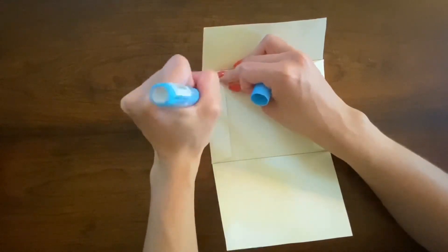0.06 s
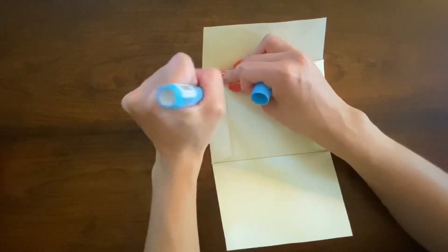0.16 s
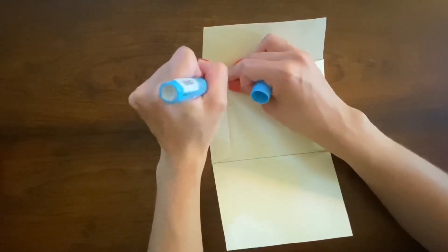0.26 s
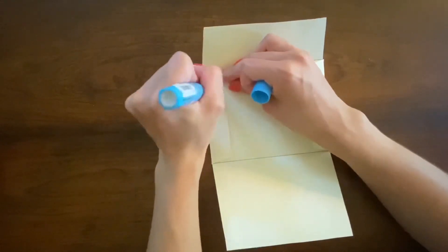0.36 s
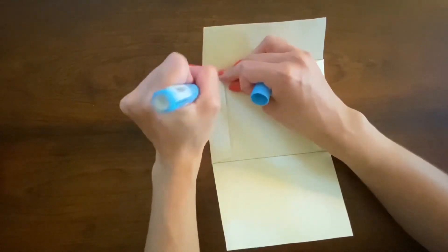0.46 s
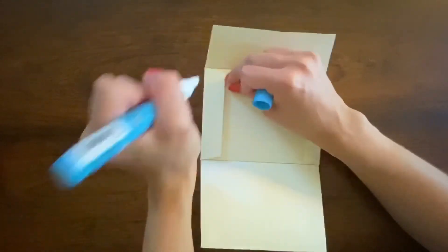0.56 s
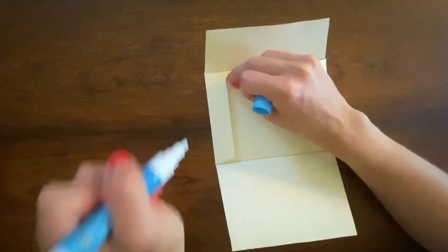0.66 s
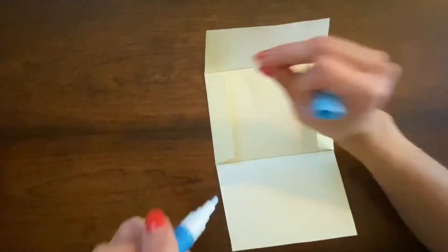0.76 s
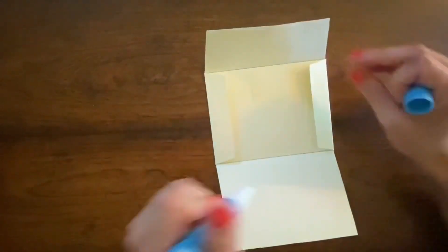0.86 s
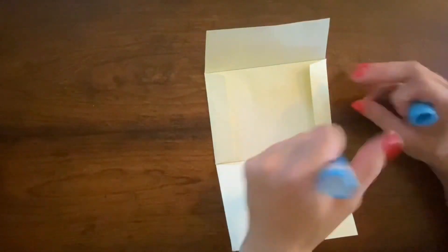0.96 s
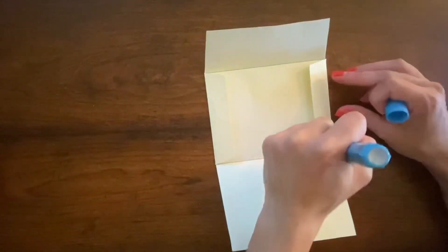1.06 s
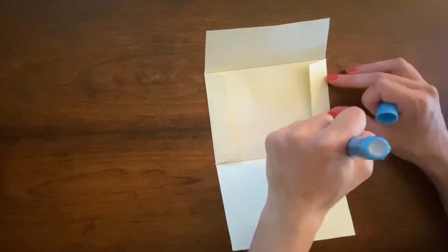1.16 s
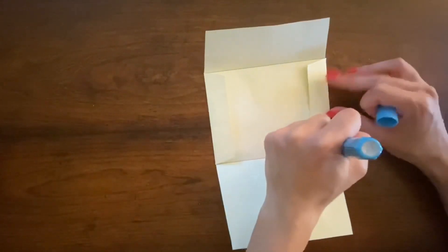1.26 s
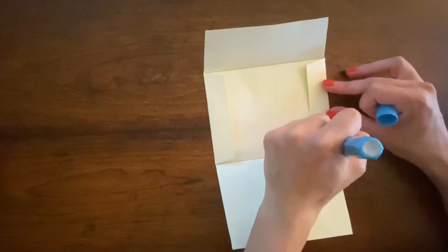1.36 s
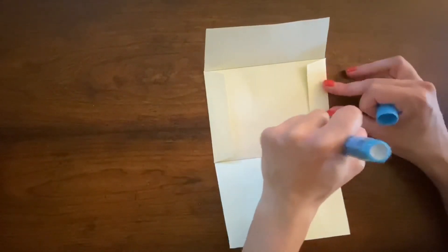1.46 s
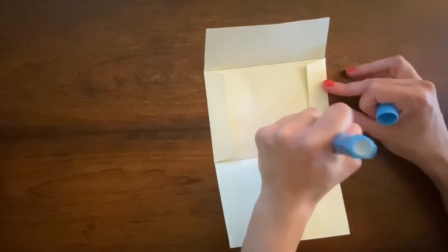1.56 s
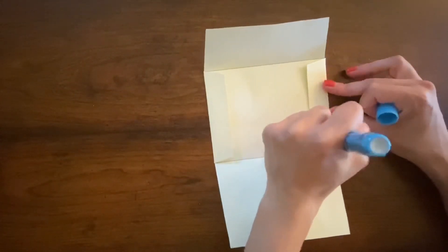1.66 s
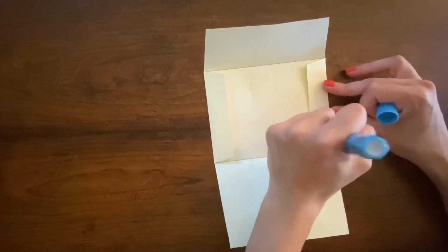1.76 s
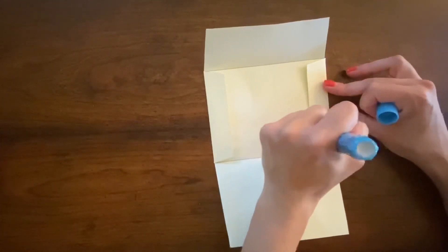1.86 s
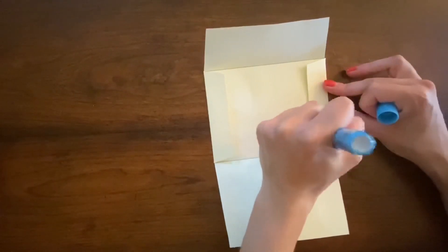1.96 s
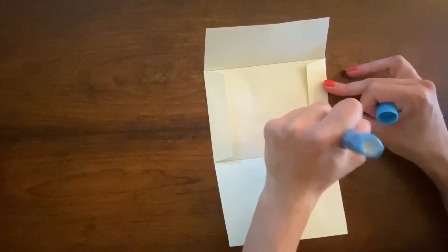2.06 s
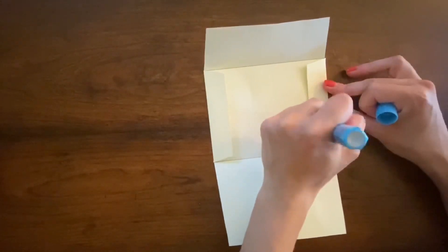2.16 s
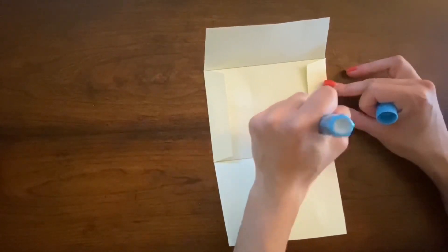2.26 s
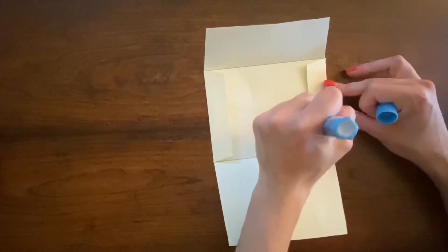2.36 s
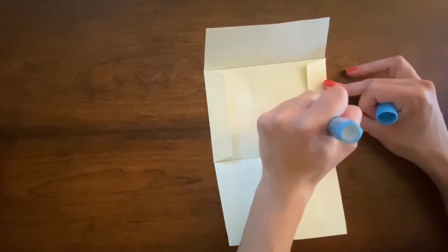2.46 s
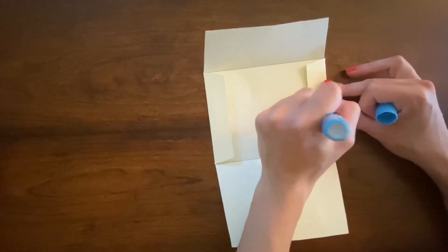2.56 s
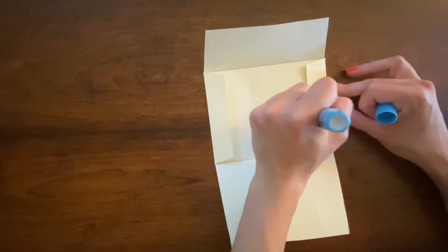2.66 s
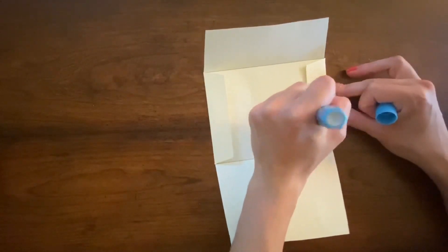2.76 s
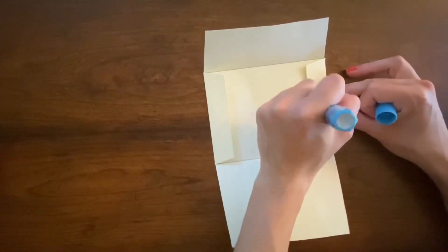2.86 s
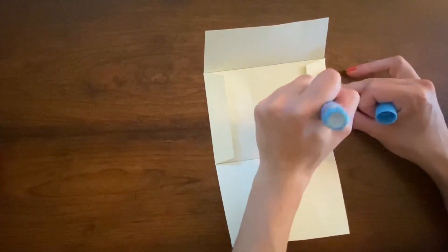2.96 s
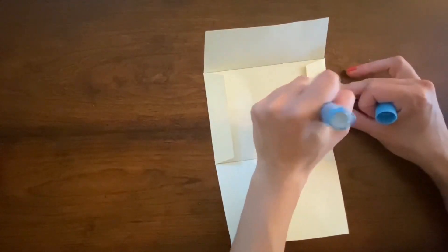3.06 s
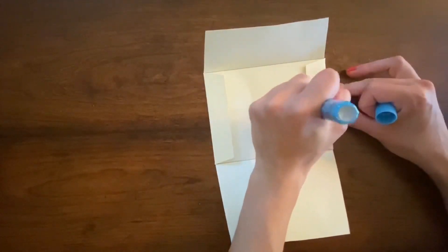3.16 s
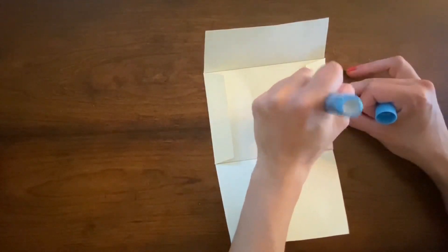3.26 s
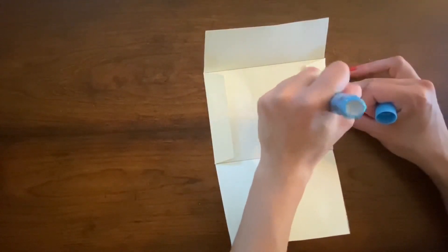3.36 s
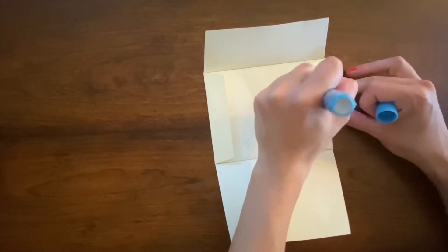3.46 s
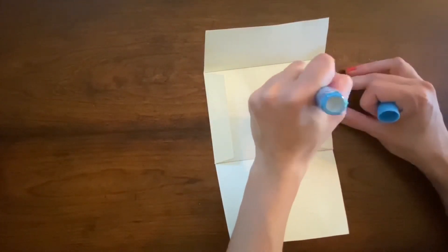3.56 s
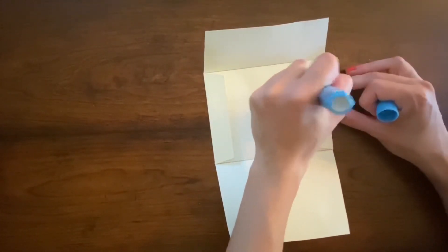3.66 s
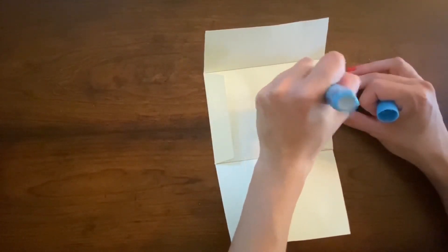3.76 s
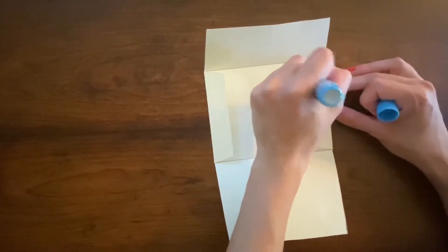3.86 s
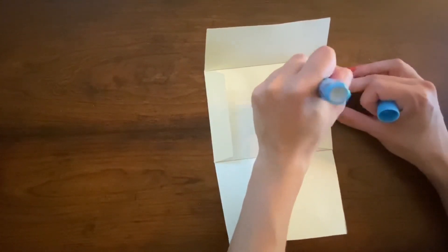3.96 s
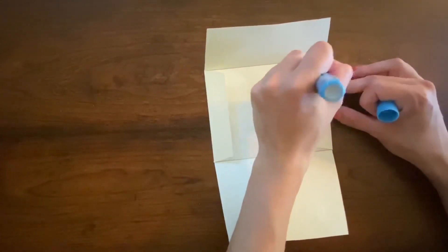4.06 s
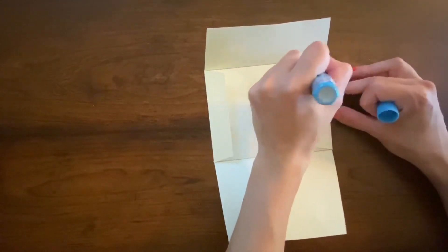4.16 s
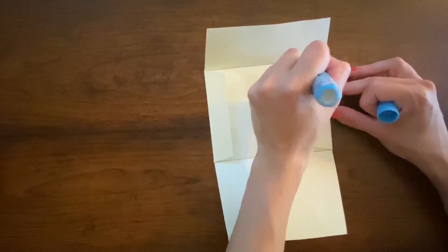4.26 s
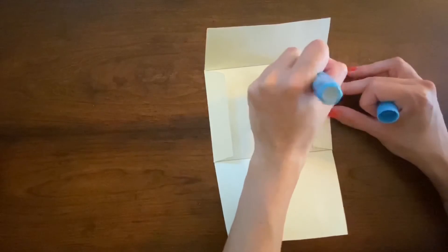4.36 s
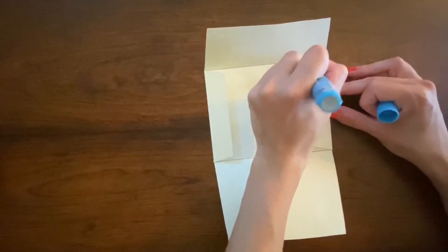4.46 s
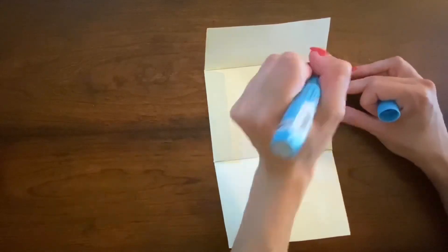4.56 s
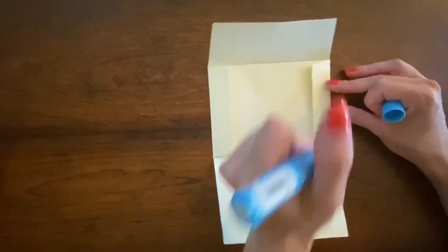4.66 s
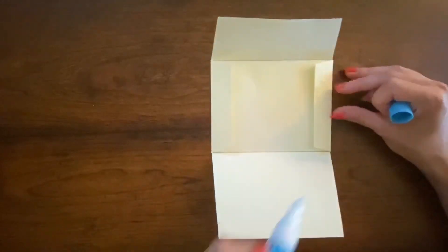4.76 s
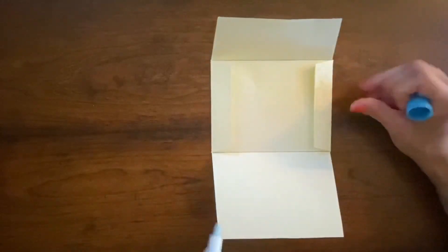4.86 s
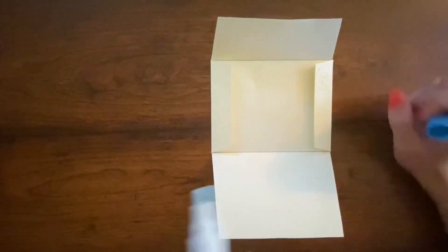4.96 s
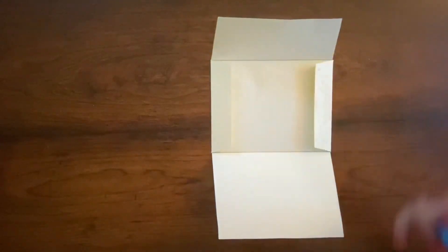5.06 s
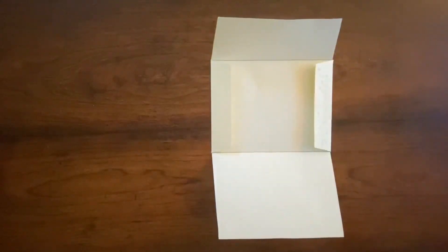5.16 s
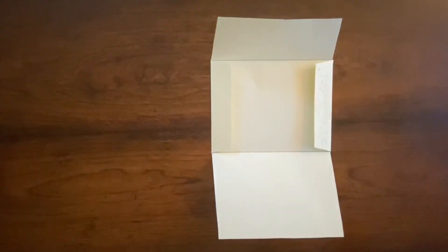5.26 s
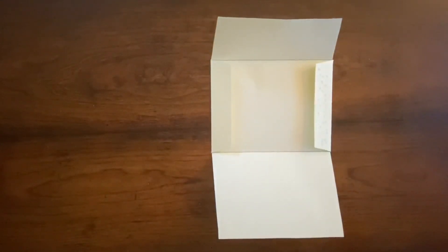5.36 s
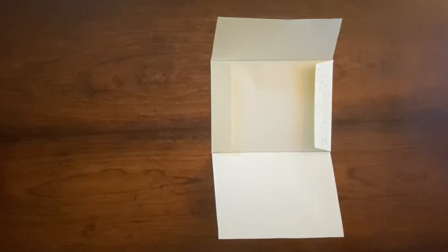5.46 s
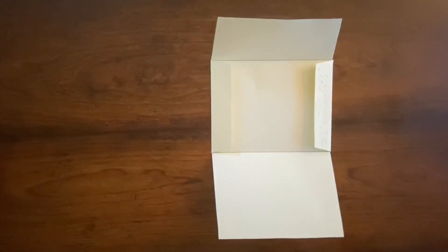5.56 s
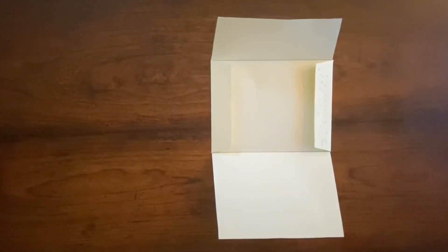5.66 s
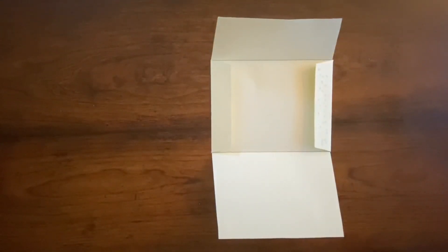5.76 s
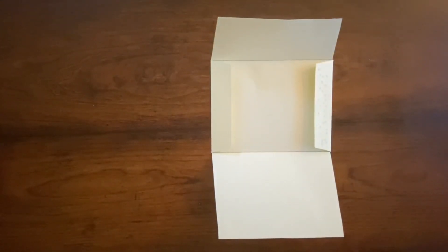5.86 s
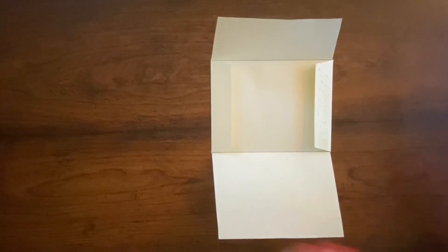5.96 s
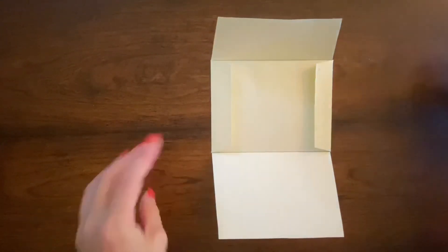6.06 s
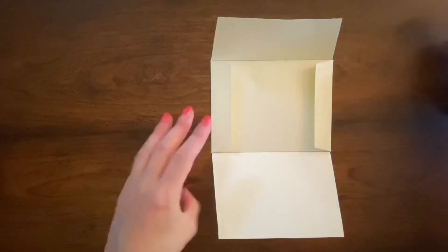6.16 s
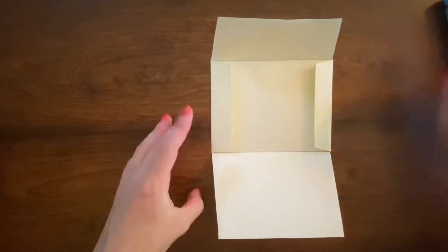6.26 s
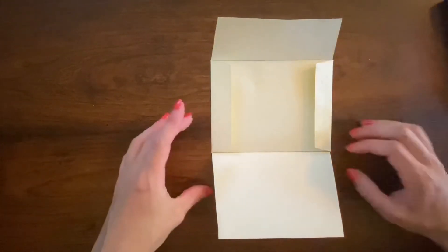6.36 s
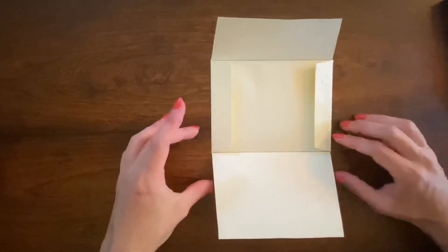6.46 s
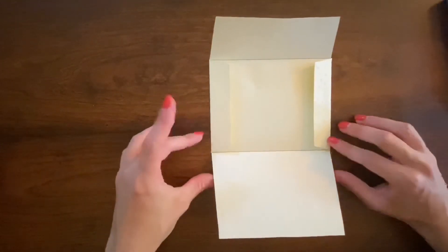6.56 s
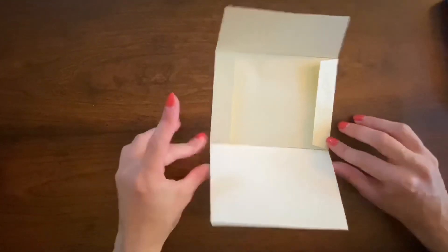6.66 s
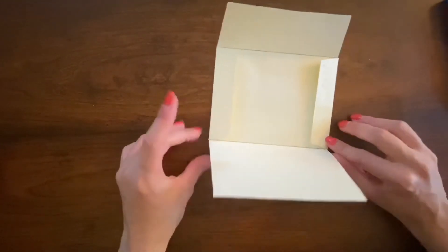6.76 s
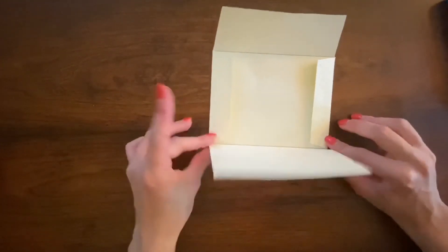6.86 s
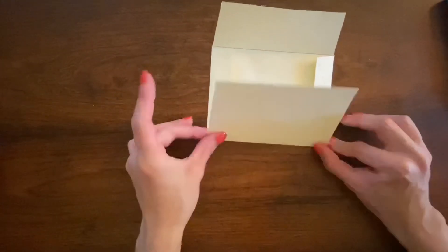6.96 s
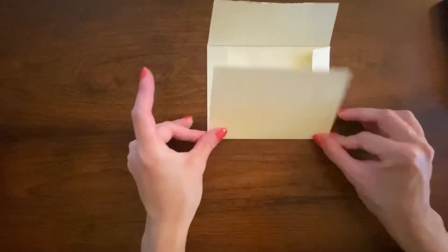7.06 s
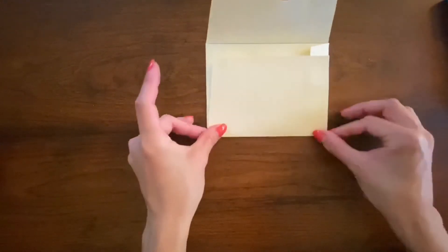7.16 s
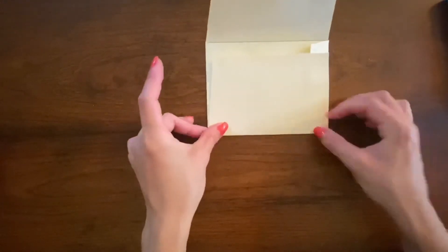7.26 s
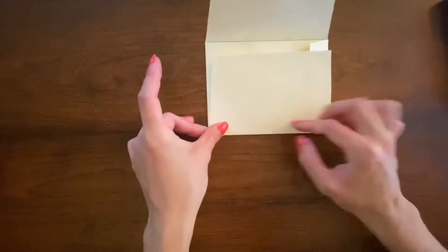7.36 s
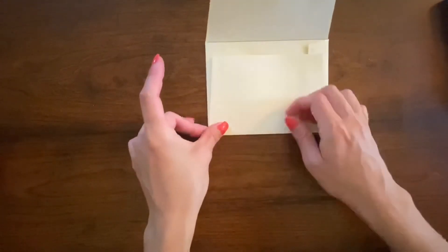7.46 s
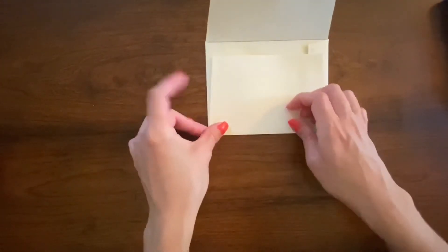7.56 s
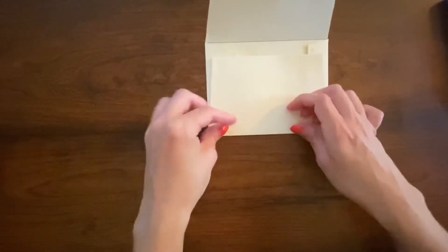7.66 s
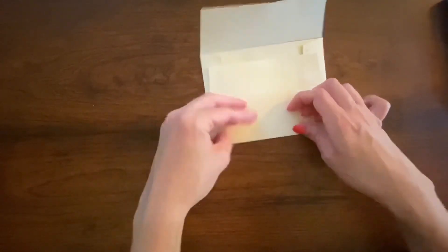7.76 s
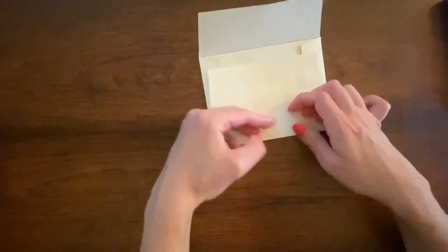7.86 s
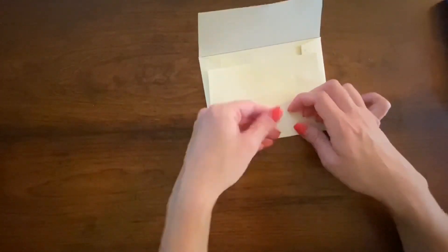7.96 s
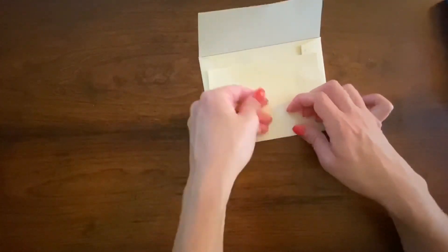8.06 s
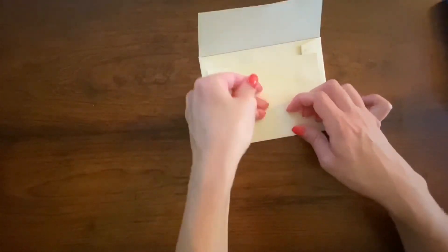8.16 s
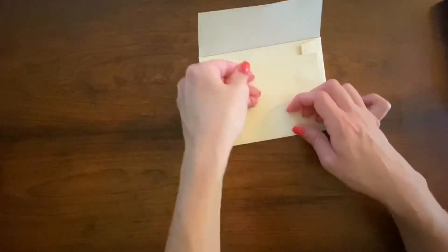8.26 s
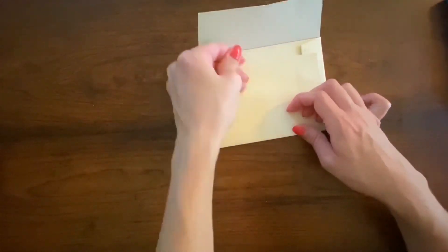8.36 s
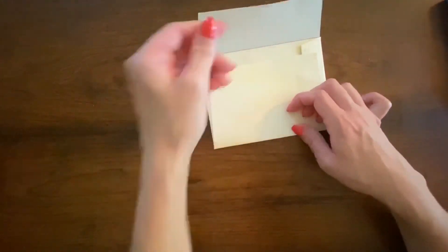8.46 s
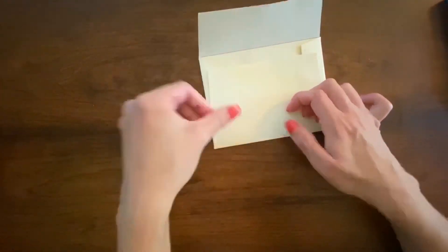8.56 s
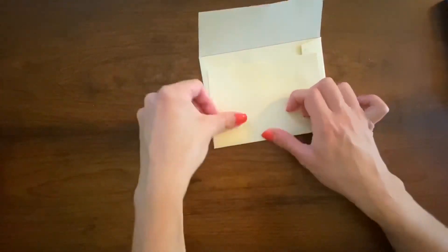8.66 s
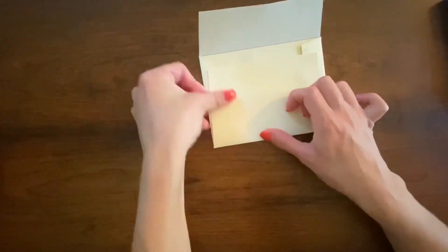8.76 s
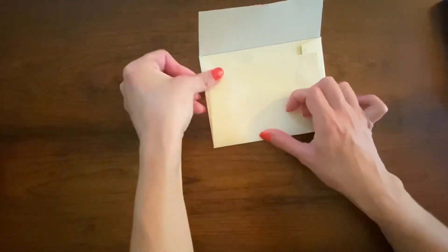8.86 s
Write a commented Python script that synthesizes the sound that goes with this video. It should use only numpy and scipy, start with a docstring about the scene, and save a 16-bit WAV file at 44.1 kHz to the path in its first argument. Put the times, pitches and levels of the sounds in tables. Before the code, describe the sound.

Quick juddering glue-stick strokes thump a tabletop, followed by plastic cap clacks, a dull put-down knock, and faint rustling of folded card.

```python
"""A glue stick is rubbed quickly to and fro over card on a wooden table, close to two microphone ports
in a quiet room. Each turn of the stick judders the table modes with a burst of force; each slide is friction
noise on the card. Stick-slip grains also make the capping and putting down of the stick, then the folding
and smoothing of the envelope by hand. Low rumble, a faint whine and short reflections surround it all."""
import sys
import numpy as np
from scipy import signal
from scipy.fft import rfft, irfft, next_fast_len
from scipy.io import wavfile
from scipy.ndimage import uniform_filter1d

SR = 44100
rng = np.random.default_rng(int(sys.argv[2]) if len(sys.argv) > 2 else 0)


def to_wav(sig):
    """Store sig (one row per channel, or 1-D mono) as 16-bit WAV at the path in sys.argv[1].

    Samples outside -1..1 are clipped; the rate is SR.
    """
    pcm = np.clip(np.atleast_2d(sig), -1, 1) * 32767
    pcm = np.round(pcm).astype(np.int16)
    wavfile.write(sys.argv[1], SR, pcm.T)  # frames by channels


N = 392049

# colour of the rustling sheet: (frequency [Hz], relative level [dB per Hz])
RUSTLE_COLOUR = [(300, 2.5), (800, -7), (1400, -3), (2400, -3), (3300, -3.5), (5000, -4), (10000, -14.5)]
# strokes of the stick, each a catch and then a slide; thud and creak are trimmed in knocks():
# (time of the catch [s], table's thud level [dB], glue's creak level [dB], slide's hiss level [dB])
STICK_STROKES = [(0.04, -34, -43, -51.5), (0.278, -44.5, -68, -59.5), (0.358, -31.5, -43, -60),
                 (1.354, -31, -41, -52.5), (1.435, -30, -43, -52.5), (1.563, -32, -43, -57.5),
                 (1.658, -34.5, -46.5, -58.5), (1.75, -33.5, -46, -55), (1.847, -31, -45.5, -57),
                 (1.927, -28, -35.5, -49), (2.01, -33.5, -60, -48.5), (2.103, -34.5, -68, -53.5),
                 (2.185, -30, -44.5, -64), (2.275, -31, -46, -56.5), (2.355, -30.5, -51, -63),
                 (2.436, -36, -59, -54), (2.527, -31.5, -54, -60.5), (2.607, -34.5, -59, -67),
                 (2.696, -32, -50, -61.5), (2.769, -36, -65, -55.5), (2.85, -44, -77, -66.5),
                 (2.933, -35, -58, -60.5), (3.01, -31.5, -53, -62), (3.103, -33.5, -53, -52),
                 (3.189, -31.5, -53, -57.5), (3.276, -31, -43, -56), (3.368, -31, -50, -55),
                 (3.442, -35, -55, -54.5), (3.528, -33.5, -63, -55.5), (3.612, -34, -54, -53.5),
                 (3.709, -28.5, -45, -55.5), (3.79, -33.5, -66, -59), (3.884, -31, -45, -51.5),
                 (3.968, -32.5, -59, -56), (4.046, -35, -55, -52.5), (4.133, -32.5, -53, -54.5),
                 (4.225, -30.5, -47, -55), (4.306, -31, -42, -58), (4.369, -36, -67, -71)]


def gain_of(db):
    """Decibels to amplitude."""
    return 10 ** (np.asarray(db) / 20)


def evened(x):
    """Scales to unit rms."""
    return x / np.sqrt(np.mean(x ** 2) + 1e-20)


def read(points, hz):
    """Joins (frequency [Hz], value) points on a log-frequency axis."""
    f, value = np.transpose(points)
    return np.interp(np.log(hz + 1), np.log(f + 1), value)


def add(mix, s, sound):
    """Mixes a sound in at time s, cutting whatever falls outside the mix."""
    start = round(s * SR)
    sound = sound[..., max(-start, 0):]
    part = mix[..., max(start, 0):][..., :sound.shape[-1]]
    part += sound[..., :part.shape[-1]]


def filtered(x, response):
    """Applies a frequency response, given as a function of Hz."""
    size = next_fast_len(x.shape[-1], real=True)
    spectrum = rfft(x, size) * response(np.fft.rfftfreq(size, 1 / SR))
    return irfft(spectrum, size)[..., :x.shape[-1]]


def low_cut(x, edge_hz):
    """Cuts away nearly everything below edge_hz with a steep slope."""
    return filtered(x, lambda hz: hz ** 4 / (hz ** 4 + edge_hz ** 4))


def swell(t, rise, fall):
    """A rounded cusp: exponential growth up to about t = 0, then exponential decay; rise and fall in s."""
    growth = np.exp(np.clip(-t / rise, -60, 60))
    decay = np.exp(np.clip(t / fall, -60, 60))
    shape = 1 / (growth + decay)
    return shape / shape.max()


def wide(grains):
    """A broad surface: each port also hears slips from other spots, mostly in the midrange."""
    # level of the slips from elsewhere: (frequency [Hz], level [dB])
    spread_levels = [(150, -25), (330, -10), (600, 1.5), (1200, -5), (2200, -13), (4500, -16.5),
                     (9000, -27)]
    shifted = np.roll(grains, len(grains) // 2)
    elsewhere = filtered(shifted, lambda hz: gain_of(read(spread_levels, hz)))
    return evened(np.array([grains + elsewhere, grains - elsewhere]))


def friction(spectrum, per_s, grain_db, patchy_db=2.0, size=N):
    """Countless tiny slips with sparse larger ones among them; the colour shifts as the contact moves."""
    struck = rng.random(size) < per_s / SR
    slips = rng.standard_normal(size) * rng.exponential(1, size) * struck
    drive = rng.standard_normal(size) + gain_of(grain_db) * evened(slips)
    hz, _, z = signal.stft(drive, SR, nperseg=512)
    # random colour, smoothed over frequency and then over time
    patches = uniform_filter1d(rng.standard_normal(z.shape), size=5, axis=0)
    patches = evened(uniform_filter1d(patches, size=9, axis=1))
    z = z * gain_of(read(spectrum, hz)[:, None] + patchy_db * patches)
    return wide(signal.istft(z, SR, nperseg=512)[1][:size])


def ports(x, pan_db=0, lead_ms=0):
    """Sound reaches the two microphone ports with a phase and level difference; positive favours the left."""
    # phase between the ports: (frequency [Hz], lead of the left [rad])
    port_phases = [(20, 0), (900, .05), (2200, .5), (5400, 1.4), (7400, 3.14), (9000, 4.9), (10700, 6.28),
                   (12500, 8), (14000, 9.4), (16000, 11.5)]

    def half_lead(hz):
        return read(port_phases, hz) / 2 + np.pi * hz * lead_ms / 1000

    def at_port(port, side):
        shifted = filtered(port, lambda hz: np.exp(1j * side * half_lead(hz)))
        return shifted * gain_of(side * pan_db / 2)

    return np.array([at_port(x[0], 1), at_port(x[1], -1)])


def air(apart=0.33):
    """Low room rumble, much alike at both ports, and the faint narrow whine of some appliance."""
    # colour of the rumble: (frequency [Hz], relative level [dB per Hz])
    rumble_colour = [(20, -24), (40, -9.5), (58, 4.5), (76, -2.5), (100, 6.5), (135, -7), (190, -5.5),
                     (260, -11), (600, -19.5), (1100, -29.5), (2400, -33), (3500, -42), (8000, -51),
                     (15500, -53)]
    rumble_db, whine_db, whine_hz = -57.5, -80, 805.3
    noises = rng.standard_normal((3, N))
    common, left, right = (evened(filtered(z, lambda hz: gain_of(read(rumble_colour, hz)))) for z in noises)

    def spread(hz):
        # the ports differ more at higher pitches
        return np.clip(apart * np.sqrt(hz / 150), 0, .8)

    shared = filtered(common, lambda hz: np.sqrt(1 - spread(hz) ** 2))
    rumble = shared + filtered(np.array([left, right]), spread)
    whine = filtered(rng.standard_normal(N), lambda hz: 1 / (1 + ((hz - whine_hz) / 19) ** 2))
    return gain_of(rumble_db) * rumble + gain_of(whine_db) * evened(whine)


def room(x, first=0.00288):
    """Diffuse reflections of a small room, different at each port, each band dying at its own speed."""
    # time to fall by 60 dB: (frequency [Hz], decay time [s])
    decay_times = [(100, .3), (500, .26), (2500, .27), (6000, .25), (15000, .17)]
    # strength of the tail: (frequency [Hz], level [dB])
    tail_levels = [(80, -5), (220, -45), (550, -7.5), (1600, -12.5), (4000, -9.5), (9000, -18.5),
                   (15000, -14)]
    # silent until the first reflection [s]
    taps = rng.standard_normal((2, SR // 2)) * (np.arange(SR // 2) > first * SR)
    hz, t, z = signal.stft(taps, SR, nperseg=256)
    t60 = read(decay_times, hz)[:, None]
    decay = np.exp(-np.log(1000) * t / t60)
    # gives bands of any decay time the same energy before their levels
    unit_energy = np.sqrt(2 * np.log(1000) / (t60 * SR))
    z = z * decay * unit_energy * gain_of(read(tail_levels, hz))[:, None]
    tail = signal.istft(z, SR, nperseg=256)[1]
    return signal.fftconvolve(x, tail, axes=1)[:, :N]


def nearby(x, fade=0.0035):
    """Quick sparse echoes off the table, hands and other near objects differ between the ports."""
    # strength of the echoes: (frequency [Hz], level [dB])
    echo_levels = [(80, -4), (220, -45), (550, -24), (1000, -3), (2200, -13), (5000, -3), (10000, -35),
                   (15000, -18)]
    t = np.arange(SR // 30) / SR
    sparse = rng.standard_normal((2, len(t))) * (rng.random((2, len(t))) < 1 / 20)
    taps = sparse * np.exp(-t / fade)
    taps = taps / np.linalg.norm(taps, axis=1, keepdims=True)
    echoes = signal.oaconvolve(x, taps, axes=1)[:, :N]
    return filtered(echoes, lambda hz: gain_of(read(echo_levels, hz)))


def flexes():
    """The flexing or scraping card gives short rasps around one broad resonance."""
    # (time [s], level [dB], centre [Hz], length from the peak to 1/e [s], width [octaves])
    flex_rows = [(0.071, -50, 4800, 0.012, 0.27), (0.316, -55, 4300, 0.015, 0.26),
                 (0.546, -55, 1700, 0.024, 0.36), (0.605, -58.5, 4900, 0.009, 0.2),
                 (0.933, -60.5, 780, 0.047, 0.74), (2.373, -53, 1440, 0.015, 0.99),
                 (2.465, -61, 1500, 0.025, 2.6), (2.801, -60, 1380, 0.022, 0.67),
                 (3.825, -62.5, 1380, 0.023, 0.63), (6.925, -59, 1700, 0.032, 1.1),
                 (7.01, -57.5, 1600, 0.022, 0.33), (7.077, -57.5, 2080, 0.021, 0.7),
                 (7.147, -61.5, 2290, .012, 0.94), (7.271, -56, 2270, 0.028, 0.27),
                 (7.332, -55, 2160, 0.014, 0.57), (7.64, -58.5, 3020, 0.019, 0.39),
                 (7.715, -54.5, 2960, 0.034, 0.44), (7.882, -57.5, 2780, 0.013, 0.35),
                 (8.449, -65.5, 1330, 0.032, 1.8)]
    out = np.zeros((2, N))
    t = np.arange(SR // 5) / SR - 1 / 10
    for s, db, centre, length, octaves in flex_rows:
        grains = friction(RUSTLE_COLOUR, per_s=1200, grain_db=-5.0, size=len(t))
        rasp = filtered(grains, lambda hz: 1 / np.hypot(1, np.log2((hz + 1) / centre) * 2 / octaves))
        add(out, s + t[0], gain_of(db) * evened(rasp) * np.exp(-(t / length) ** 2))
    return out


def handling(uneven_db=2.0, attack_share=0.13, release_share=0.14):
    """Each brush over the card gathers speed, holds and slows down, with uneven pressure."""
    # light passes of stick, fingers or sheet:
    # (time of the middle [s], length [s], sheet's rustle level [dB], surface hiss level [dB])
    brush_rows = [(0.161, 0.034, -65, -60.5), (0.217, 0.027, -68, -59), (0.274, 0.024, -61, -60),
                  (0.472, 0.072, -55.5, -57.5), (0.546, 0.037, -63, -55.5), (0.649, 0.18, -67, -72.5),
                  (0.916, 0.048, -74, -86), (1.013, 0.12, -73, -94), (1.186, 0.037, -65, -56.5),
                  (1.251, 0.043, -68, -65), (1.32, 0.035, -69, -65), (4.657, .17, -65, -65),
                  (4.98, 0.12, -72.5, -75.5), (5.958, 0.088, -74, -74), (6.478, 0.065, -72.5, -77.5),
                  (6.603, 0.079, -74, -65.5), (6.704, 0.073, -76, -72.5), (6.813, 0.047, -72, -62.5),
                  (6.921, 0.078, -55, -60), (7.008, 0.041, -58, -61), (7.075, 0.056, -63, -66.5),
                  (7.302, 0.22, -64, -69.5), (7.588, 0.023, -67, -77), (7.72, .18, -67, -63),
                  (7.868, 0.026, -57.5, -63), (7.952, 0.096, -74, -65), (8.185, 0.3, -71, -64.5),
                  (8.303, 0.02, -87, -62.5), (8.445, 0.028, -67, -65), (8.561, 0.037, -59.5, -83),
                  (8.627, 0.048, -71, -69), (8.737, 0.1, -70, -66), (8.86, .07, -83, -74)]
    # colour of the surface hiss: (frequency [Hz], relative level [dB per Hz])
    finger_colour = [(2000, -15), (3500, -5), (5500, 2.5), (7200, -3.5), (9000, -3.5), (12000, -10.5),
                     (15500, -11)]
    sheet, skin = np.zeros((2, N))
    for s, length, rustle, hiss in brush_rows:
        u = np.arange(-2 * length, 2 * length, 1 / SR) / length
        speed = 1 / (1 + np.exp(-(u + .5) / attack_share) + np.exp((u - .5) / release_share))
        add(sheet, s - 2 * length, gain_of(rustle) * speed)
        add(skin, s - 2 * length, gain_of(hiss) * speed)
    # slow noise, mostly below 45 Hz
    wander = evened(filtered(rng.standard_normal(N), lambda hz: np.exp(-(hz / 45) ** 2)))
    rustling = sheet * friction(RUSTLE_COLOUR, per_s=800, grain_db=-11.5)
    hissing = skin * friction(finger_colour, per_s=910, grain_db=-8.5)
    return gain_of(uneven_db * wander) * (rustling + hissing)


def clacks():
    """Plastic rubs harder and harder until it seats or lands, then comes to rest."""
    # colours of the plastic tube and cap: (frequency [Hz], relative level [dB per Hz])
    CAP_SLIDES = [(200, -18), (550, -17), (900, -11.5), (1300, 3), (1650, -6), (2200, -1), (3200, -11),
                  (4800, -12), (7000, -15.5), (9000, -17.5), (12000, -28.5), (15500, -25)]
    CAP_SEATS = [(200, -3.5), (700, -11.5), (1300, -12.5), (2000, -16.5), (3400, -0.5), (4500, -4),
                 (5600, 5), (7000, -0.5), (9000, -4.5), (12000, -19), (15500, -14)]
    TUBE_TOUCHES = [(50, -12), (90, 6), (220, 15), (550, 0), (850, -10.5), (1300, -10), (1900, -16.5),
                    (2500, -6.5), (3600, -7), (5600, -16), (8000, -13), (15000, -31)]
    TUBE_SCRAPES = [(100, 7), (500, 10), (1500, -8), (3000, -2), (6500, -6.5), (9000, -9), (15000, -23)]
    TUBE_LANDS = [(45, -16), (85, 5.5), (220, 3), (300, 3), (480, 1.5), (600, -4.5), (860, -0.5),
                  (1100, -6.5), (1700, -5), (1950, 3.5), (2250, -9), (2650, -1.5), (3300, -18.5),
                  (5600, -11), (8500, -21.5), (15000, -30)]
    # capping and putting down: (time of the peak [s], level [dB], rise [s], fall [s],
    # left over right [dB], left lead [ms], colour [one of the above])
    clack_rows = [(5.292, -34.5, .012, 0.014, 2, 0.0029, CAP_SLIDES),
                  (5.69, -33.5, 0.0085, 0.0093, 1, 0.00058, CAP_SEATS),
                  (6.016, -37.5, 0.0099, 0.015, -2, 0, TUBE_TOUCHES),
                  (6.089, -40, 0.0098, 0.028, -2.5, 0.0061, TUBE_SCRAPES),
                  (6.14, -26.5, 0.011, 0.012, -0.5, 0.021, TUBE_LANDS)]
    out = np.zeros((2, N))
    t = np.arange(SR // 2) / SR - 1 / 5
    for s, db, rise, fall, pan_db, lead_ms, spectrum in clack_rows:
        grains = friction(spectrum, per_s=3000, grain_db=-6, patchy_db=2, size=len(t))
        rub = gain_of(db) * swell(t, rise, fall) * grains
        add(out, s + t[0], ports(rub, pan_db, lead_ms))
    return out


def hand_bumps():
    """Hands bump the table; knocks() turns these rows into sound."""
    # levels are trimmed in knocks(): (time [s], thud level [dB], creak level [dB], scuff level [dB])
    bump_rows = [(4.871, -38.5, -49.5, -63), (4.906, -40.5, -51, -57), (6.203, -39, -64, -59),
                 (8.527, -49.5, -64, -77), (8.565, -42.5, -60, -69), (8.624, -50.5, -67, -78)]
    return bump_rows


def slides(rise=0.0083, fall=0.0099, rasp_db=-1.0):
    """After each catch, tacky glue peels off the card fibres in fine crackles, loudest at top speed."""
    # colours of hiss and rasp: (frequency [Hz], relative level [dB per Hz])
    hiss_colour = [(1500, -19), (3000, -11), (4200, -6.5), (5600, 0.5), (7200, 0.5), (9000, -4.5),
                   (12000, -9.5), (15500, -15.5)]
    rasp_colour = [(300, -11), (700, 8), (1000, -5.5), (1350, 4.5), (1700, 6), (2050, 5.5), (2900, -22),
                   (5000, -9), (12000, -26)]
    # rasp that goes with each hiss, before the trim rasp_db: (hiss level [dB], rasp level [dB])
    rasp_by_hiss = [(-72, -79), (-53, -62.5), (-43, -66.5)]
    slide_after_s = 0.032  # from the catch to top speed
    t = np.arange(SR // 5) / SR - .07
    speed = swell(t, rise, fall)
    hiss, rasp = np.zeros((2, N))
    for s, _, _, db in STICK_STROKES:
        start = s + slide_after_s + t[0]
        rasp_level = np.interp(db, *np.transpose(rasp_by_hiss)) + rasp_db
        add(hiss, start, gain_of(db) * speed)
        add(rasp, start, gain_of(rasp_level) * speed)
    hissing = hiss * friction(hiss_colour, per_s=900, grain_db=-7.5, patchy_db=2.5)
    rasping = rasp * friction(rasp_colour, per_s=960, grain_db=-3.0, patchy_db=4.5)
    return hissing + rasping


def catches():
    """Every stroke begins with a catch; how much it scuffs the card follows from its thud."""
    # both trimmed in knocks(): (thud level [dB], scuff level [dB])
    scuff_by_thud = [(-65, -64), (-33.5, -57.5), (-30, -49.5)]
    thud_points, scuff_points = np.transpose(scuff_by_thud)
    return [(s, thud, creak, np.interp(thud, thud_points, scuff_points)) for s, thud, creak, _ in STICK_STROKES]


def table(force, soft_hz=380):
    """The wooden top rings in a few low modes; the soft contact gives it no treble."""
    # (frequency [Hz], width [Hz], relative level [dB])
    table_modes = [(87, 13.5, 5), (131.4, 27, 6), (211.9, 16.5, 7.5), (291, 7.1, -7), (382, 45, -18.5)]

    def modes(hz):
        return sum(gain_of(db) * 1j * hz * w / (f * f - hz * hz + 1j * hz * w) for f, w, db in table_modes)

    return low_cut(filtered(force, lambda hz: modes(hz) / (1 + (hz / soft_hz) ** 4)), 55)


def knocks(rows, thud_db=-6.0, creak_db=-3, scuff_db=-7, rise=0.0044, fall=0.0092, late=0.0038,
           creak_rise=0.0082, creak_fall=0.011, scuff_rise=0.0082, scuff_fall=0.018):
    """Each knock is a short burst of stick-slip force: the glue creaks, the table thuds, the card scuffs."""
    # colours of creak and scuff: (frequency [Hz], relative level [dB per Hz])
    creak_colour = [(200, 3), (340, -1), (440, 2), (510, -6), (620, 0), (710, -15.5), (1000, -29.5),
                    (2000, -35.5)]
    scuff_colour = [(500, -6), (900, 6), (1350, 11), (1700, 7), (2100, 4), (3000, 0.5), (4200, 2),
                    (5600, 5), (10000, -5), (15500, -11)]
    t = np.arange(SR // 4) / SR - .03
    thuds, drag, grip = np.zeros((3, N))
    for s, db, creak, scuff in rows:
        judder = rng.standard_normal(len(t)) * swell(t - late, rise, fall)
        # so brief a push holds all low pitches about equally
        flat = irfft(np.exp(1j * np.angle(rfft(judder))), len(t))
        thud = table(flat * swell(t - late, 2 * rise, 3 * fall))
        # the level refers to the loudest 600 samples
        loudest = np.sqrt(uniform_filter1d(thud ** 2, size=600).max())
        add(thuds, s + t[0], gain_of(db + thud_db) * thud / loudest)
        add(drag, s + t[0], gain_of(creak + creak_db) * swell(t - late, creak_rise, creak_fall))
        add(grip, s + t[0], gain_of(scuff + scuff_db) * swell(t, scuff_rise, scuff_fall))
    creaking = drag * friction(creak_colour, per_s=400, grain_db=-8.0, patchy_db=2.5)
    scuffing = grip * friction(scuff_colour, per_s=900, grain_db=-8.5, patchy_db=2.5)
    return thuds + creaking + scuffing


def scene():
    """Work on the table, the cap nearer by, the room around them."""
    work = knocks(catches() + hand_bumps()) + slides() + handling() + flexes()
    direct = ports(work, pan_db=-1.0) + low_cut(clacks(), edge_hz=61)
    return direct + nearby(direct) + room(direct) + air()


def record(dry, low_hz=30):
    """The small microphones lose the deepest bass; a steep filter then limits the treble."""
    lean = filtered(dry, lambda hz: hz ** 2 / np.hypot(hz ** 2, low_hz ** 2))
    treble_limit = signal.firwin(511, 15850, window=("kaiser", 9), fs=SR)  # edge in Hz
    return signal.oaconvolve(lean, treble_limit[None], "same")


dry = scene()
out = record(dry)
to_wav(out)
```